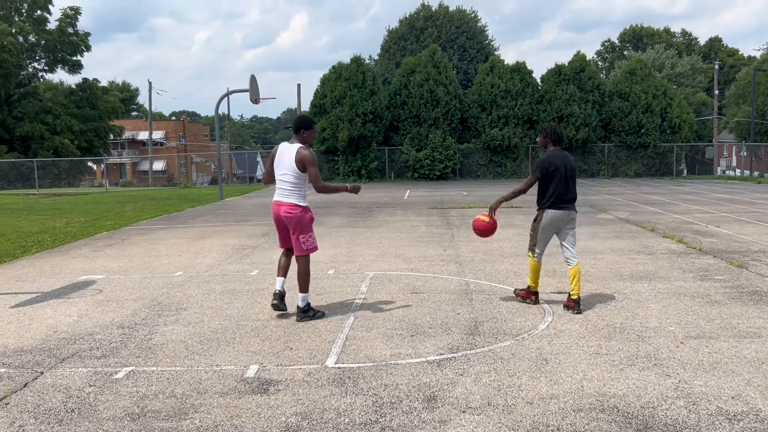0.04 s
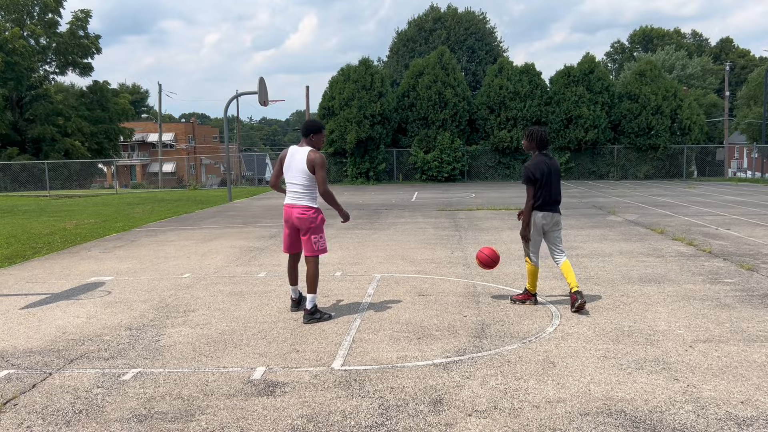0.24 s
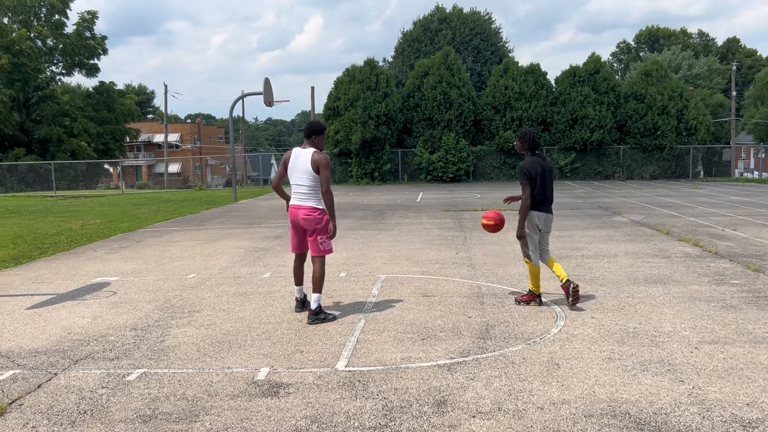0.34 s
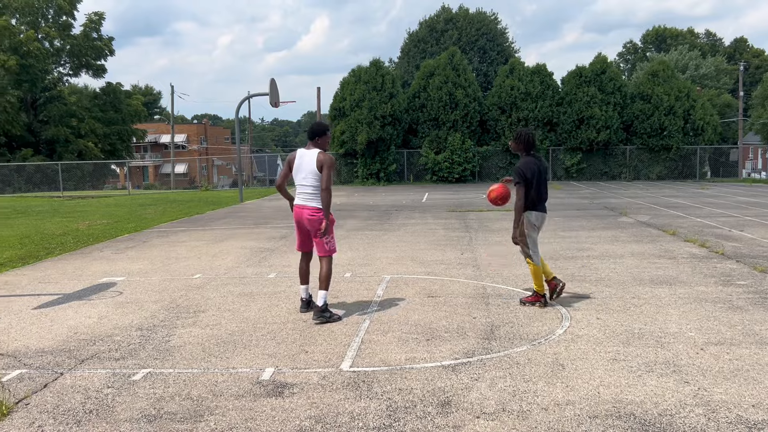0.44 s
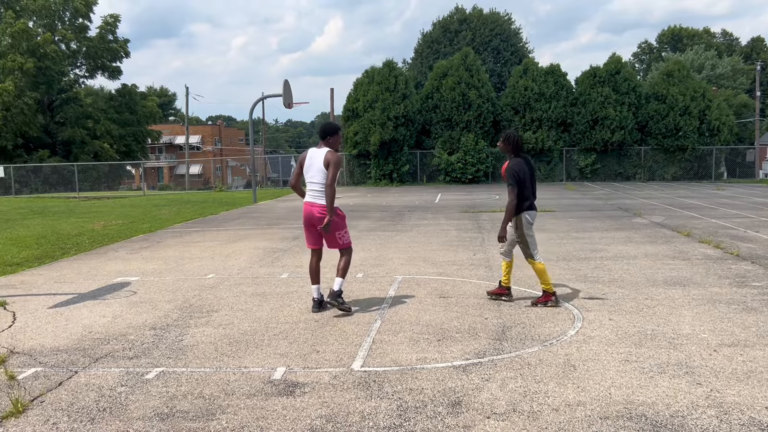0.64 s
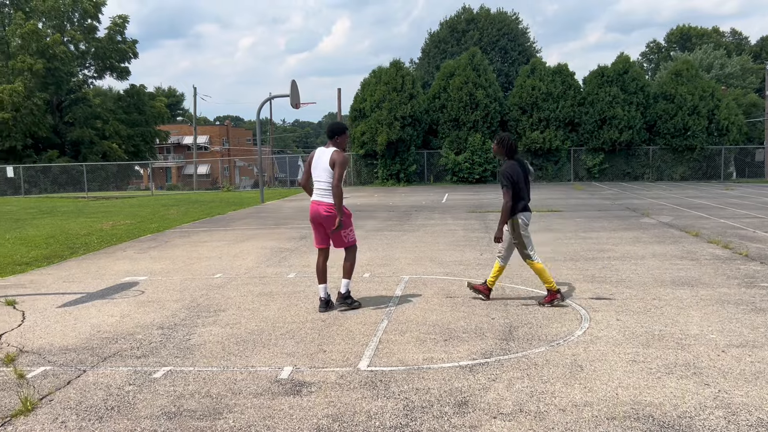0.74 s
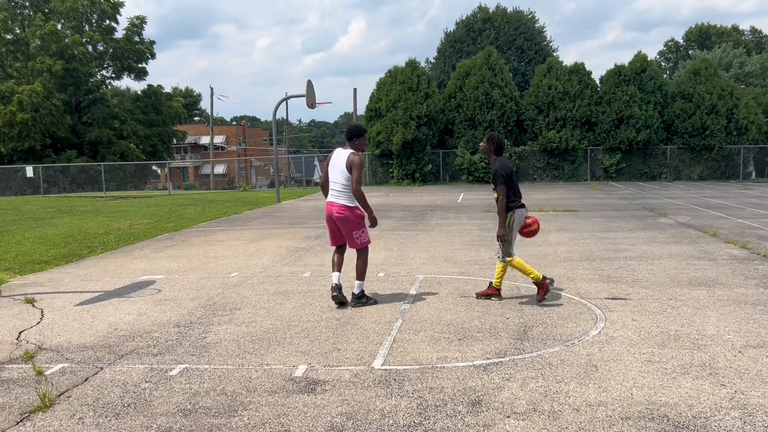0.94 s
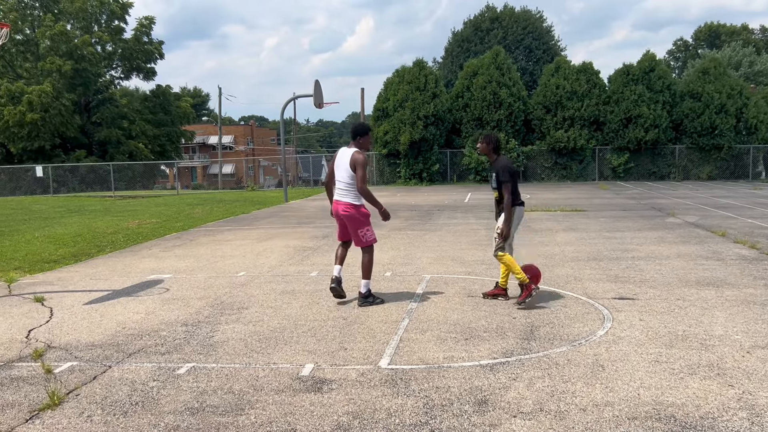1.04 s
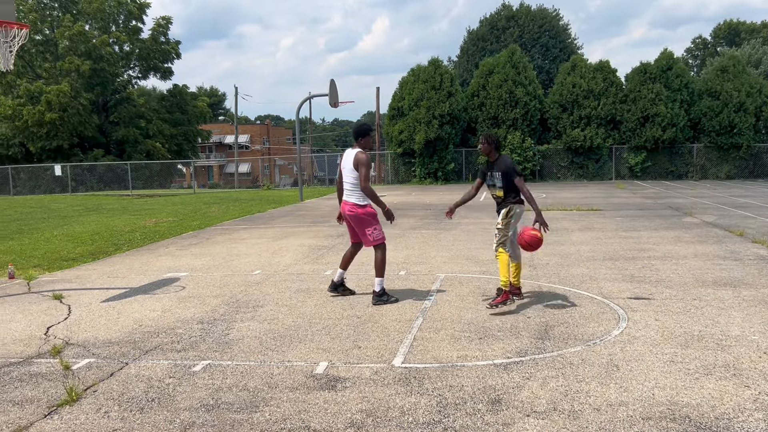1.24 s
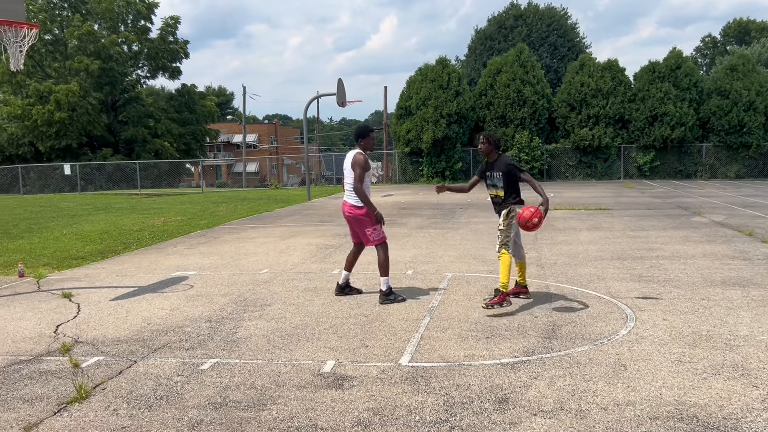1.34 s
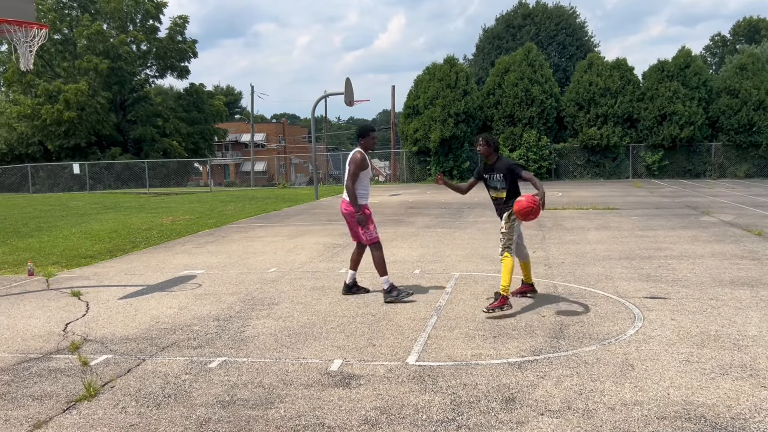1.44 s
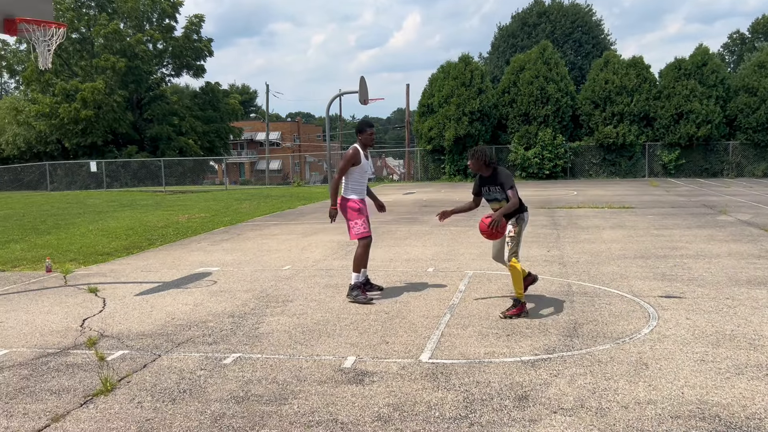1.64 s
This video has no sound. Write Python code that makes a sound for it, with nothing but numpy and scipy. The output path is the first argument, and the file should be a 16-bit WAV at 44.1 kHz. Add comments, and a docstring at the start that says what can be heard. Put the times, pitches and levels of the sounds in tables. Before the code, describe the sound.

Two sharp basketball bounces on an open-air court, with soft footsteps and scuffing soles.

```python
"""Basketball on an outdoor court

A basketball is dribbled twice on open asphalt, a few metres away. Each bounce is a sharp slap,
a thump that sags in pitch as the ball flattens, a second slap as it springs back, and a short ring.
Shoes scuff and step on the grit; far walls answer faintly over a low outdoor rumble."""
import sys
import numpy as np
from scipy import signal
from scipy.fft import rfft, irfft, next_fast_len
from scipy.io import wavfile
from scipy.ndimage import uniform_filter1d

SR = 44100
rng = np.random.default_rng(int(sys.argv[2]) if len(sys.argv) > 2 else 0)


def dump(signal):
    """Clip the signal to [-1, 1] and save it as 16-bit WAV at the path in sys.argv[1]."""
    limited = np.clip(np.atleast_2d(signal).T, -1, 1)
    pcm = np.round(limited * 32767).astype(np.int16)
    wavfile.write(sys.argv[1], SR, pcm)


N = 74970
T = np.arange(N) / SR


# The two bounces: start_s, slap_db, treble_db, patch_pitch_ratio, crack_hz, knock_db, thump_rise_s,
# thump_db, rebound_delay_s, rebound_db, ring_db, shell_pitch_ratio, ping_db
BOUNCES = [(0.2217, -15.5, 1, 1.036, 3610, -32.5, 0.0079, -10.7, .012, -22, -28, 1.02, -61),
           (1.1299, -15.5, -1.5, 1.257, 5240, -17, 0.012, -12, .0095, -29.5, -32, .97, -72)]

def ball():
    """Rubber hits asphalt: the contact layers start together and the rebound follows just after."""
    out = np.zeros(N)
    for (start_s, slap_db, treble_db, patch_pitch, crack_hz, knock_db, rise_s,
         thump_db, rebound_delay_s, rebound_db, ring_db, shell_pitch, ping_db) in BOUNCES:
        out += at(start_s + rebound_delay_s, amp(rebound_db) * rebound(shell_pitch))
        hit = amp(slap_db) * slap(treble_db, patch_pitch, crack_hz)
        hit += amp(thump_db) * thump(rise_s)
        hit -= mode(hz=334, db=knock_db, t60_s=0.027)  # hollow knock of a firmly pushed ball
        hit += amp(ring_db) * ring(shell_pitch) + ping(ping_db)
        out += at(start_s, hit)
    return out


# Tone of rubber on asphalt, and its top end: freq_hz, level_db
SLAP_TONE = [(150, -26), (400, 10.5), (800, -2.5), (1400, 9), (2100, 9.5), (2700, -1.5), (3700, -4),
             (4500, -4.5), (5500, -9.5), (7300, -10), (8500, -17.5)]
SLAP_TOP = [(9500, -30), (11800, -23), (16000, -28)]
# Decay of the slap's noise burst: freq_hz, t60_s
SLAP_DECAY = [(300, 0.026), (1000, 0.049), (2000, 0.03), (4000, 0.018), (12000, 0.024)]
# Modes of the rubber patch that meets the ground: pitch_hz, level_db, t60_s
PATCH_MODES = [(785, -6.5, 0.031), (1502, -2.5, 0.019)]

def slap(treble_db, pitch, crack_hz):
    """First contact: a click whose treble runs ahead through the shell, a burst, a ringing patch."""
    bass_lag_s, corner_hz = 0.00401, 587
    click = -impulse(SLAP_TONE + SLAP_TOP, treble_db)
    click /= np.abs(click).max()
    click = filtered(click, lambda hz: np.exp(
        -2j * np.pi * bass_lag_s * corner_hz * np.log1p(hz / corner_hz)))
    burst = dying(noise(SLAP_TONE + SLAP_TOP, treble_db), SLAP_DECAY)
    patch = sum(mode(hz * pitch, db, t60_s) for hz, db, t60_s in PATCH_MODES)
    crack = mode(crack_hz, db=-2.5 + 4.6 * treble_db, t60_s=0.0078)  # jumps out on a bright slap
    return amp(6) * click + amp(-3) * burst - patch - crack


def thump(rise_s):
    """The ball flattens and recovers: a few low cycles that sag in pitch, with an overtone."""
    start_hz, end_hz, sag_s = 319.6, 61.8, 0.00817
    peak_s, fall_s = 0.014, 0.013
    hz = end_hz + (start_hz - end_hz) * np.exp(-T / sag_s)
    phase = 2 * np.pi * np.cumsum(hz) / SR
    from_peak = T - peak_s
    swell = np.exp(-np.where(from_peak < 0, (from_peak / rise_s) ** 2, np.abs(from_peak / fall_s) ** 1.58))
    return -swell * (np.sin(phase) + amp(-10.5) * swell * np.sin(2 * phase))


# Tone of the second slap: freq_hz, level_db
REBOUND_TONE = [(150, -11), (280, 9.5), (550, -8), (800, 7), (1100, -4), (1700, -0.5), (2350, -6),
                (3000, -14), (4500, -13.5), (8000, -34), (15000, -56)]
# Its decay: freq_hz, t60_s
REBOUND_DECAY = [(300, 0.073), (1200, 0.038), (2400, 0.033), (5000, 0.016), (10000, 0.069)]
# Modes of the snapping shell: pitch_hz, level_db, t60_s
SNAP_MODES = [(1070, 4, 0.03), (1863, -10, 0.047), (2333, -1, 0.018)]

def rebound(pitch):
    """The shell snaps back into shape with a second, softer slap."""
    snap = sum(mode(hz * pitch, db - 0.5, t60_s) for hz, db, t60_s in SNAP_MODES)
    burst = dying(noise(REBOUND_TONE), REBOUND_DECAY)
    return (snap + burst) * attack(rise_s=0.00068)


# Body of the ball: pitch_hz, level_db, t60_s
BALL_MODES = [(426.3, 3.5, 0.14), (800, 7.5, 0.066), (980, 8.5, 0.041), (1330, 3.5, 0.061),
              (1415, 10, 0.047), (1690, -15, .035), (2050, -34, 0.14), (3550, -50, 0.068)]

def ring(pitch):
    """The shell and the air inside ring briefly, a little differently on each bounce."""
    modes = sum(mode(hz * pitch, db + rng.normal(0, 1), t60_s, phase_turns=rng.random())
                for hz, db, t60_s in BALL_MODES)
    return modes * attack(rise_s=0.0062)


def ping(level_db):
    """The air inside holds a faint, high, beating tone."""
    beat_hz, depth = 9, 0.27
    beat = 1 + depth * np.cos(2 * np.pi * beat_hz * T)
    return beat * mode(hz=2902, db=level_db, t60_s=1.4)


# Shoe slides: peak_s, rise_s, fall_s, level_db, treble_db
SCUFFS = [(0.164, .023, 0.033, -43.5, -10), (.36, 0.0097, 0.022, -53, -13),
          (0.57, 0.0037, 0.0078, -62, -0.5), (.85, 0.016, 0.024, -57.5, 4.5),
          (1.265, 0.017, 0.025, -59.5, -2.5), (1.47, 0.019, 0.0094, -77, 13.5),
          (1.555, 0.056, 0.07, -55, -16.5), (1.616, .018, 0.14, -55, -24)]
# Tone of the scrape: freq_hz, level_db
SCUFF_TONE = [(200, -9), (600, -6), (1100, 3), (1600, -4.5), (2200, -1), (3400, -4), (5200, -13),
              (8200, -8.5), (9500, -45), (15500, -19)]

def scuffs():
    """Soles slide over loose grit: short swells of noise with a grainy flutter."""
    grit_db = 2.5
    out = np.zeros(N)
    for peak_s, rise_s, fall_s, level_db, treble_db in SCUFFS:
        flutter = unit(uniform_filter1d(rng.standard_normal(N), size=60))
        grit = unit(amp(grit_db * flutter))
        swell = np.exp(-((T - peak_s) / np.where(T < peak_s, rise_s, fall_s)) ** 2)
        out += amp(level_db) * swell * grit * noise(SCUFF_TONE, treble_db)
    return out


# Dull low thuds: a faint low wall echo just after the first bounce, then two footfalls: start_s, level_db
THUDS = [(.316, -51.5), (1.544, -40.5), (1.602, -39.5)]
# Tone of a dull thud: freq_hz, level_db
THUD_TONE = [(60, -6), (170, 6), (350, 1.5), (800, -18.5), (1500, -11), (2800, -18.5), (6000, -56),
             (15000, -72)]
# Its decay: freq_hz, t60_s
THUD_DECAY = [(150, 0.08), (1000, 0.073), (6000, .04)]

def thuds():
    """Dull low thuds: a faint low echo from the walls soon after the first bounce, then two footfalls on the
    asphalt."""
    out = np.zeros(N)
    for start_s, level_db in THUDS:
        thud = dying(noise(THUD_TONE), THUD_DECAY) * attack(rise_s=0.0016)
        out += at(start_s, amp(level_db) * thud)
    return out


# Slapback from far walls: delay_s, level_db
ECHOES = [(.056, -30), (0.091, -23)]
# EQ of the walls: freq_hz, gain_db
WALL_EQ = [(50, -23), (100, 0.5), (150, 10.5), (260, 1), (500, -12), (1500, -8), (4000, -18), (12000, -19)]
# Tone of the reverb tail: freq_hz, level_db
TAIL_TONE = [(60, 0), (200, -2.5), (500, 4.5), (1500, -5.5), (5000, -10), (12000, -8.5)]
# Its decay: freq_hz, t60_s
TAIL_DECAY = [(100, 0.17), (1000, 0.31), (3000, 0.72), (8000, 0.93), (15000, 0.21)]

def court(x):
    """Far walls return blurred echoes in the centre; trees add a thin, wide tail."""
    tail_db, tail_width, blur_t60_s = -24, 0.7, 0.048
    tails = [dying(noise(TAIL_TONE), TAIL_DECAY) for _ in range(2)]
    mid_tail, side_tail = [amp(tail_db) * tail / np.linalg.norm(tail) for tail in tails]
    walls = np.zeros(N)
    for delay_s, level_db in ECHOES:
        blur = rng.standard_normal(N) * amp(-60 * T / blur_t60_s)
        walls += at(delay_s, amp(level_db) * blur / np.linalg.norm(blur))
    walls = signal.fftconvolve(walls, impulse(WALL_EQ))[:N]
    response = stereo(mid_tail + walls, tail_width * side_tail)
    return signal.fftconvolve(x[None], response, axes=1)[:, :N]


# Tone of the outdoor bed: freq_hz, level_db
AIR_TONE = [(20, -43), (44, -6.5), (77, -0.5), (130, -10), (234, -16), (300, -21), (470, -26.5), (800, -31),
            (1200, -35), (1700, -37), (2800, -43), (5500, -47.5), (7500, -56.5), (9500, -74), (12000, -62),
            (16000, -84)]
# Its fader ride: time_s, level_db
AIR_FADER = [(0, -48), (.15, -45), (.7, -46.5), (1.1, -44.5), (1.7, -44)]
# Its width: freq_hz, side_to_mid_ratio
AIR_WIDTH = [(60, 0.069), (200, 0.26), (400, 0.44), (900, 1), (2400, 0.55), (12000, 0.89)]
# Its pan: freq_hz, left_minus_right_db
AIR_PAN = [(80, -2.4), (400, 0), (1300, 2), (5000, 2.4), (12000, 0.18)]

def outdoor_air():
    """A nearly steady bed of rumble and leaf hiss, wider above the bass."""
    mid = noise(AIR_TONE)
    side = filtered(noise(AIR_TONE), lambda hz: along(AIR_WIDTH, hz))
    fader = amp(np.interp(T, *np.transpose(AIR_FADER)))
    return fader * panned(stereo(mid, side), AIR_PAN)


def amp(db):
    """Decibels to gain."""
    return 10 ** (np.asarray(db) / 20)


def unit(x):
    """Scale to rms 1."""
    return x / np.sqrt(np.mean(x ** 2) + 1e-20)


def at(start_s, x):
    """Delay x to start at start_s."""
    return np.pad(x, (max(round(start_s * SR), 0), 0))[:N]


def attack(rise_s):
    """A fade-in that softens an onset."""
    return 1 - np.exp(-T / rise_s)


def mode(hz, db, t60_s, phase_turns=0):
    """One resonance: a decaying sine."""
    return amp(db - 60 * T / t60_s) * np.sin(2 * np.pi * (hz * T + phase_turns))


def along(points, hz):
    """Read (freq_hz, value) points on a log frequency axis."""
    freqs, values = np.transpose(points)
    return np.interp(np.log(hz + 1), np.log(freqs + 1), values)


def filtered(x, response):
    """Apply a frequency response to x."""
    size = next_fast_len(N + SR // 2)
    return irfft(rfft(x, size) * response(np.fft.rfftfreq(size, 1 / SR)), size)[..., :N]


def treble(hz):
    """A shelf that goes from 0 to 1 through the upper mids."""
    return hz ** 4 / (hz ** 4 + 2800 ** 4)


def noise(tone, treble_db=0):
    """Coloured noise, set to rms 1 and then shelved in the treble."""
    coloured = unit(filtered(rng.standard_normal(N), lambda hz: amp(along(tone, hz))))
    return filtered(coloured, lambda hz: amp(treble_db * treble(hz)))


def impulse(tone, treble_db=0):
    """A minimum-phase click with this tone."""
    hz = np.fft.rfftfreq(N, 1 / SR)
    cepstrum = irfft(np.log(amp(along(tone, hz) + treble_db * treble(hz))), N)
    fold = np.r_[1, np.full(N // 2 - 1, 2), np.zeros(N - N // 2)]
    return irfft(np.exp(rfft(cepstrum * fold)), N)


def dying(x, decay):
    """Each band of x dies at its own speed."""
    spectrum, hz = rfft(x), np.fft.rfftfreq(N, 1 / SR)
    centres, t60s = np.transpose(decay)
    bands = [irfft(spectrum * along(np.c_[centres, solo], hz), N) for solo in np.eye(len(decay))]
    return sum(band * amp(-60 * T / t60_s) for band, t60_s in zip(bands, t60s))


def stereo(mid, side):
    """Mid and side to left and right."""
    return np.array([mid + side, mid - side])


def panned(pair, balance):
    """Weight left against right, band by band."""
    return filtered(pair, lambda hz: amp(np.array([[.5], [-.5]]) * along(balance, hz)))


# Width of ball and shoes: freq_hz, side_to_mid_ratio
PLAY_WIDTH = [(60, 0.033), (250, 0.042), (600, 0.2), (2000, 0.48), (4000, 0.19), (8000, 0.71),
              (15000, 0.93)]
# Their pan, echoes included: freq_hz, left_minus_right_db
PLAY_PAN = [(60, -0.66), (200, -1.5), (380, -1.2), (700, -2), (1300, -3), (2400, -4.5), (4400, 8.5),
            (8000, -2.5), (15000, -3.5)]

def scene():
    """Ball and shoes sit slightly right over the outdoor bed; scatter widens their treble."""
    scatter_s = 0.000432
    near = ball() + scuffs() + thuds()
    side = filtered(near, lambda hz: 1j * along(PLAY_WIDTH, hz)
                    * np.exp(-2j * np.pi * hz * scatter_s * treble(hz)))
    return panned(stereo(near, side) + court(near), PLAY_PAN) + outdoor_air()


def record(dry):
    """A steep high cut on the whole mix."""
    cutoff_hz = 16500
    return filtered(dry, lambda hz: 1 / np.sqrt(1 + (hz / cutoff_hz) ** 120))


dry = scene()
out = record(dry)
dump(out)
```